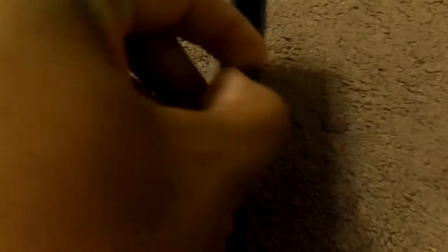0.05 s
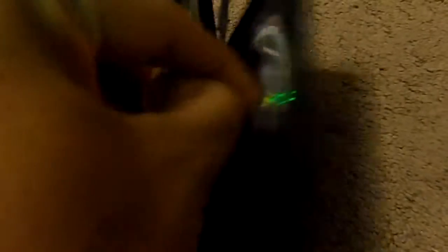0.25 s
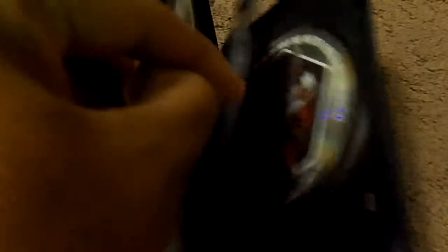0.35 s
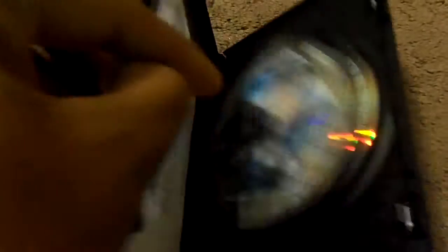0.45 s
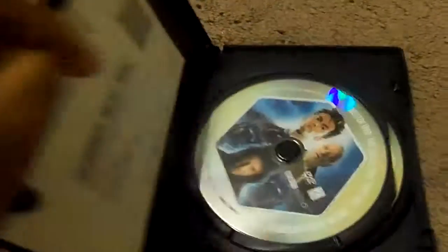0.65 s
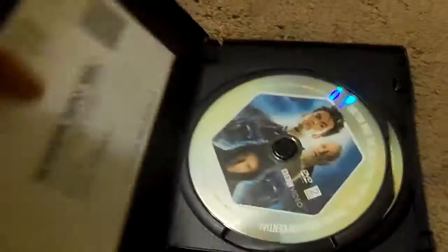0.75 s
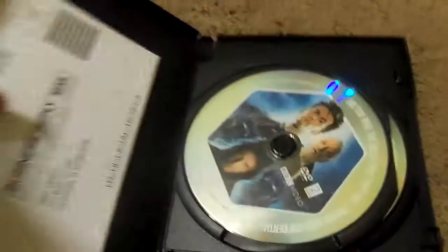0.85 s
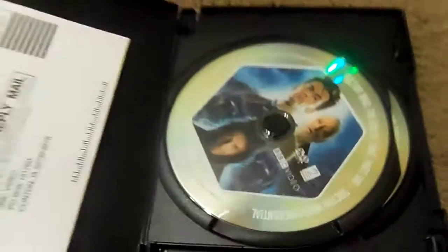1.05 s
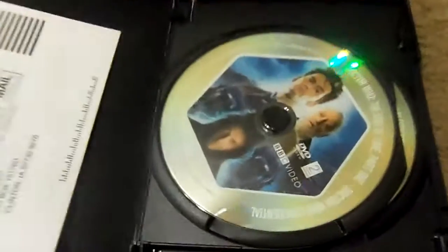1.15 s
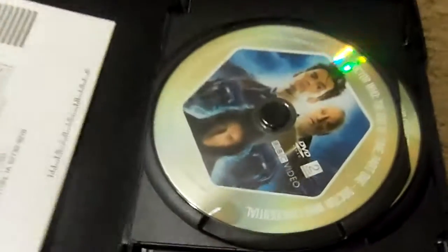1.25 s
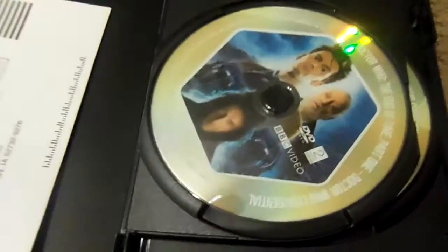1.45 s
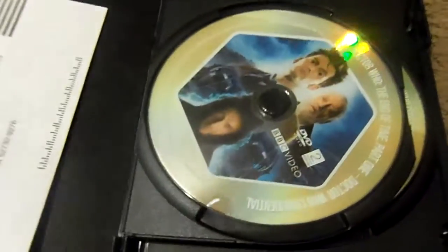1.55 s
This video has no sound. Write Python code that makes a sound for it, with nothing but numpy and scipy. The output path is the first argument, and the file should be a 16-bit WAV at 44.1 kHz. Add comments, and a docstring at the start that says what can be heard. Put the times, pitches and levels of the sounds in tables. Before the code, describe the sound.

A plastic disc case snaps open, very close, in a quiet carpeted room. Soft hiss and low rumble with barely audible ticks from 0.07 s; at 0.25 s a loud, bright cluster of cracks with a short hollow thump and rattle, dying by 0.35 s. A second, weaker hard clack comes at 0.51 s, light clicks near 0.57-0.6 s, and faint taps around 0.65-0.71 s, then only quiet hiss.

```python
"""A plastic disc case is pried open by hand in a carpeted room, close to a microphone.
Over hiss and low rumble, which ease with time, come a few faint knocks; near 0.25 s latches snap free.
The trays and lid knock and rattle as they swing out, with a second hard burst near 0.5 s, then softer ones.
Knocks are noisy contacts exciting shell resonances, low thumps and short pitched rings are damped sines,
rattling and rubbing fingers are dense ticks; sparse decaying reflections form the room."""
import sys
import numpy as np
from scipy import signal
from scipy.fft import rfft, irfft
from scipy.io import wavfile
from scipy.ndimage import uniform_filter1d

SR = 44100
rng = np.random.default_rng(int(sys.argv[2]) if len(sys.argv) > 2 else 0)


def decibels_to_gain(level_db):
    """Convert a level in decibels to a linear amplitude gain (20 dB per decade)."""
    exponent = np.asarray(level_db, float) / 20
    return 10 ** exponent


def unload_wav(signal):
    """Save mono or channel-first audio to the path in sys.argv[1] as 16-bit WAV at rate SR, clipped to [-1, 1]."""
    wavfile.write(
        sys.argv[1],
        SR,
        np.round(np.clip(np.atleast_2d(signal).T, -1, 1) * 32767).astype(np.int16),
    )


N = 70560

# resonances of the shell: pitch_hz [Hz], relative level_db [dB], decay t60_s [s]
SHELL_MODES = [(800, -15.5, 0.015), (1072, -13, 0.0416), (1400, -12, 0.01), (1840, -6.5, 0.031),
               (2176, -2, 0.04), (3000, -2, 0.059), (3570, -14, 0.012), (4126, -0.5, 0.03),
               (4760, 2, 0.0056), (5680, -7, 0.0088), (6950, 0, 0.0037), (7570, -5.5, 0.0093),
               (8890, 6, 0.0081), (9826, 4, 0.021), (12130, 0.5, 0.02)]
RESPONSE_SAMPLES = 4096  # length of a knock and of the shell's impulse response


def evened(x):
    """Normalisation: scales a signal to rms 1."""
    return x / np.sqrt(np.mean(x ** 2) + 1e-20)


def read(points, hz):
    """Linear interpolation of a table's values along log frequency."""
    f, value = np.transpose(points)
    return np.interp(np.log(hz + 1), np.log(f + 1), value)


def colour(x, db_of):
    """Minimum-phase filtering: the Hilbert transform of the log gain db_of(Hz) yields a causal response."""
    hz = abs(np.fft.fftfreq(2048, 1 / SR))
    log_gain = np.log(decibels_to_gain(np.maximum(db_of(hz), -100)))
    spectrum = np.exp(np.conj(signal.hilbert(log_gain)))
    taps = np.fft.ifft(spectrum).real[:1024]
    return signal.oaconvolve(x, taps)[:len(x)]


def add(mix, start_s, sound):
    """Superposition: adds a sound to the mix, in place, from start_s on."""
    part = mix[round(start_s * SR):][:len(sound)]
    part += sound[:len(part)]


def ringing(luck):
    """Modal synthesis: the shell's impulse response at one spot is a click plus damped sine modes."""
    modes_db = -2  # all modes together, relative to the click
    spread_db, detune = 2.5, 0.02  # variation from spot to spot: dB, fraction of the pitch
    t = np.arange(RESPONSE_SAMPLES) / SR
    modes = np.zeros(len(t))
    for (pitch_hz, level_db, t60_s), level_luck, pitch_luck in zip(SHELL_MODES, *luck):
        envelope = decibels_to_gain(level_db + spread_db * level_luck - 60 * t / t60_s)
        wave = np.sin(2 * np.pi * pitch_hz * (1 + detune * pitch_luck) * t)
        modes += envelope * wave / np.sqrt(t60_s)  # long modes do not gain energy
    click = t == 0
    return click + decibels_to_gain(modes_db) * modes / np.linalg.norm(modes)


def knock(row, chatter, luck):
    """Source-filter principle: a short noisy chatter of contacts excites the shell at one spot."""
    rise_s = 0.00082
    contact_s, contact_db = 0.0008, 10  # the firm contact within the chatter: delay, strength
    spot_db, spot_t60_s = -10, 0.007  # the struck part rings at its brightest pitch
    bass_cut_hz = 600  # thin panels radiate little bass
    start_s, peak_db, brightest_hz, t60_s, below_db, above_db = row
    t = np.arange(len(chatter)) / SR

    spot = decibels_to_gain(-60 * t / spot_t60_s) * np.sin(2 * np.pi * brightest_hz * t)
    body = ringing(luck) + decibels_to_gain(spot_db) * spot / np.linalg.norm(spot)

    contacts = chatter * (1 - np.exp(-(t / rise_s) ** 2))
    contacts[round(contact_s * SR)] += decibels_to_gain(contact_db)
    contacts *= decibels_to_gain(-60 * t / t60_s)
    struck = signal.oaconvolve(contacts, body)[:len(t)]

    def slopes(hz):
        """Spectral tilt: gain in dB falls per octave on both sides of the brightest pitch."""
        octaves = np.log2(np.maximum(hz, bass_cut_hz) / brightest_hz)
        return abs(below_db) * np.minimum(octaves, 0) - abs(above_db) * np.maximum(octaves, 0)

    high_pass = signal.butter(2, bass_cut_hz, "high", fs=SR, output="sos")
    bright = signal.sosfilt(high_pass, colour(struck, slopes))
    # peak of a sine as strong as the loudest 2 ms
    loudest = np.sqrt(uniform_filter1d(bright ** 2, size=88).max() * 2)
    return start_s, decibels_to_gain(peak_db) * bright / loudest


def damped_tone(start_s, peak_db, pitch_hz, t60_s):
    """Damped oscillation: a low thump or short pitched ring of the case is a quickly decaying sine."""
    t = np.arange(SR // 10) / SR
    return start_s, -decibels_to_gain(peak_db - 60 * t / t60_s) * np.sin(2 * np.pi * pitch_hz * t)


def rattle():
    """Random impulse train: dense tiny ticks of uneven size excite the shell."""
    # loose parts rattling and fingers rubbing: time_s [s], level_db [dB]
    rattle_level = [(0, -88), (.2, -85), (0.245, -61), (.247, -41), (.275, -39), (.3, -37.5),
                    (0.329, -53.5), (0.389, -63.5), (.45, -92), (0.505, -75), (0.508, -35.5), (.53, -46.5),
                    (0.563, -52), (0.579, -45), (.6, -46.5), (.63, -62), (.645, -62), (.7, -47.5),
                    (0.734, -59), (.76, -72), (.8, -80)]
    # spectrum of the rattle: pitch_hz [Hz], relative density_db [dB per Hz]
    rattle_tone = [(200, -14), (600, -14), (1050, -1.5), (2200, -4.5), (4000, 1), (5500, -6), (9000, -10.5),
                   (14000, -19.5)]
    ticks_per_s, tick_spread_db = 5000, 2.2
    sizes = decibels_to_gain(tick_spread_db * np.minimum(rng.exponential(1, N), 4))
    happens = rng.random(N) < ticks_per_s / SR
    ticks = sizes * happens * rng.standard_normal(N)
    shell = ringing(rng.standard_normal((2, len(SHELL_MODES))))
    ticks = signal.oaconvolve(ticks, shell)[:N]
    level_db = np.interp(np.arange(N) / SR, *np.transpose(rattle_level), right=-120)
    return decibels_to_gain(level_db) * evened(colour(ticks, lambda hz: read(rattle_tone, hz)))


def room(x):
    """Reverberation: sparse reflections of random sign, each band decaying at its own speed."""
    # decay of the room: pitch_hz [Hz], t60_s [s]
    room_decay = [(200, 0.16), (1000, 0.23), (3000, 0.12), (9000, 0.14)]
    taps = np.zeros(SR // 2)
    slots = np.arange(200, len(taps) - 20, 20)  # one reflection in every 20 samples
    offsets = rng.integers(0, 20, len(slots))
    taps[slots + offsets] = rng.choice([-1., 1.], len(slots))
    hz, t, bands = signal.stft(taps, SR, nperseg=256)
    decay = decibels_to_gain(-60 * t / read(room_decay, hz)[:, None])
    tail = signal.istft(bands * decay, SR, nperseg=256)[1]
    return signal.fftconvolve(x, tail / np.linalg.norm(tail))[:N]


def hiss():
    """Spectral shaping of white noise: microphone hiss and low room rumble."""
    # spectrum of the background: pitch_hz [Hz], relative density_db [dB per Hz]
    hiss_tone = [(12, -20), (20, -3.5), (76, -9.5), (118, -10), (179, -9.5), (211, -13), (367, -14),
                 (541, -15), (821, -17), (13500, -27), (15100, -47)]
    # course of the background above its base level: time_s [s], level_db [dB]
    hiss_course = [(0, 4.5), (.3, 4), (.6, 1.5), (.8, 0)]
    base_db = -62.5  # rms
    spectrum = rfft(rng.standard_normal(N)) * decibels_to_gain(read(hiss_tone, np.fft.rfftfreq(N, 1 / SR)))
    level_db = base_db + np.interp(np.arange(N) / SR, *np.transpose(hiss_course))
    return decibels_to_gain(level_db) * evened(irfft(spectrum, N))


def scene():
    """Superposition of direct sound, room reflections and background."""
    # knocks of plastic on plastic: start_s [s], peak_db [dB], brightest_hz [Hz], chatter t60_s [s],
    # below_db and above_db [dB per octave], falls on either side of brightest_hz whose sign is ignored
    knocks = [(0.0684, -46.5, 1740, 0.013, 4, 13), (0.0983, -52.5, 1460, 0.029, -8, 5.5),
              (.1920, -54, 2000, 0.023, 17, 15), (0.222, -57, 1700, 0.035, -10, 4),
              (0.2459, -7, 3570, 0.011, 2.5, 1.5), (.2470, -5.5, 5240, 0.0094, 4.5, 7),
              (.2550, -15, 4270, 0.017, -1, 1), (0.2602, -12, 3000, 0.02, 2, 2.5),
              (0.2611, -6.5, 4400, 0.0077, 1, 0.5), (0.2656, -12, 5500, .02, 4, 2),
              (0.271, -14.5, 5300, 0.023, -0.5, -7), (.2840, -20, 5230, 0.012, 3.5, 1.5),
              (0.2892, -19, 3200, 0.0092, 9.5, 3), (0.304, -21, 3200, 0.0069, 12, 1.5),
              (0.388, -55, 3250, 0.0095, -1, 14), (0.453, -53.5, 9900, 0.033, 0, 13),
              (0.5053, -12.5, 6350, 0.0049, 20.5, 10.5), (0.5089, -20.5, 5400, 0.024, 7.5, 3),
              (0.5141, -17.5, 4400, 0.022, 7.5, 6.5), (0.5248, -38, 3760, 0.03, 10, 16),
              (0.535, -42, 3560, 0.021, 6, 18), (0.552, -45, 3400, 0.099, 11, 22),
              (0.5677, -25.5, 5020, 0.028, 2.5, 1.5), (0.5718, -31, 3750, 0.041, 0.5, 3.5),
              (0.5784, -27, 3130, 0.015, 5, 4), (0.583, -42.5, 4100, 0.014, 11, 1),
              (.589, -55, 2210, 0.025, 20, 8), (0.596, -33.5, 2290, .018, 37, 4.5),
              (.6040, -33, 3060, 0.033, 4.5, 3.5), (0.651, -48, 3900, 0.028, -3, 4),
              (0.662, -52, 2450, 0.021, 0, 14), (0.672, -48, 2780, 0.06, -0.5, 20),
              (0.6809, -38, 3950, 0.015, 3, 5), (0.6921, -38, 3980, 0.01, 0.5, 5.5),
              (0.6979, -39, 3750, 0.029, 2.5, 10.5), (0.7025, -42.5, 4260, 0.033, -1.5, 12),
              (0.7114, -41, 2320, 0.024, 7, 7.5)]
    # low thumps and short pitched rings of the case: peak_db [dB], pitch_hz [Hz], t60_s [s]
    tones = [(-20.5, 460, 0.02), (-30, 140, 0.034), (-36, 120, 0.074), (-32, 250, .03), (-20.5, 450, 0.035),
             (-49.5, 120, .07), (-45, 169, 0.039), (-32, 956, 0.03), (-43.5, 710, 0.051), (-54, 398, 0.061),
             (-19, 2100, 0.02), (-27.5, 1800, 0.027), (-45, 2800, 0.021), (-20.5, 790, .025),
             (-39, 2160, 0.028), (-39, 2160, 0.059)]
    # when each of those thumps and rings begins: start_s [s]
    tone_starts = [.2452, .2456, .2470, .2590, .2596, .2620, .5050, .5060, .5150, .6985, .2475, .5155,
                   .6045, .2605, .6825, .6925]
    room_db = -20
    case = rattle()
    draws = rng.standard_normal((len(knocks), RESPONSE_SAMPLES + 2 * len(SHELL_MODES)))
    for row, draw in zip(knocks, draws):
        chatter, luck = np.split(draw, [RESPONSE_SAMPLES])
        add(case, *knock(row, chatter, luck.reshape(2, -1)))
    for start_s, tone in zip(tone_starts, tones):
        add(case, *damped_tone(start_s, *tone))
    return (case + decibels_to_gain(room_db) * room(case) + hiss())[None]


def top_cut(x):
    """Nothing passes above the cut-off."""
    return signal.sosfilt(signal.butter(12, 15220, fs=SR, output="sos"), x)


def record(dry):
    """Soft saturation of the microphone input, then a linear-phase shelf that lowers the top treble."""
    overload = 0.8  # amplitude at which the input saturates
    edge_hz, above_edge_db = 14050, -33
    dry = overload * np.tanh(dry / overload)
    low_pass = signal.firwin(127, edge_hz, window=("kaiser", 7), fs=SR)
    low = signal.oaconvolve(dry, low_pass[None], "same")
    return top_cut(low + decibels_to_gain(above_edge_db) * (dry - low))


dry = scene()
out = record(dry)
unload_wav(out)
```